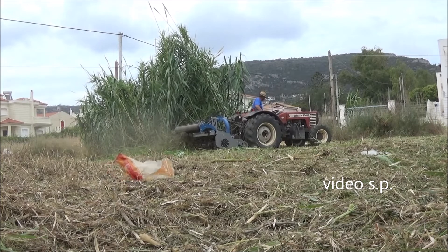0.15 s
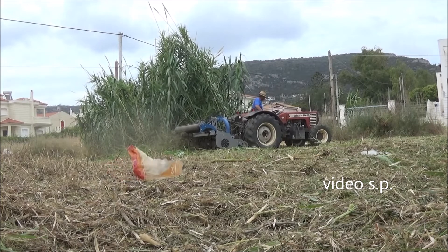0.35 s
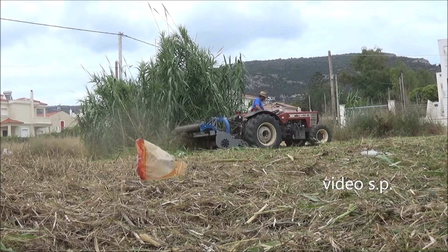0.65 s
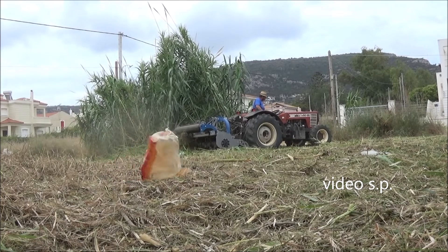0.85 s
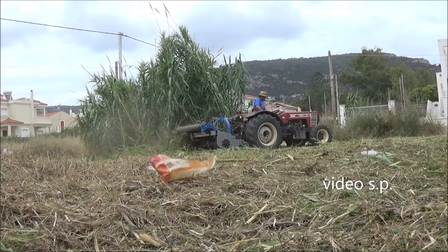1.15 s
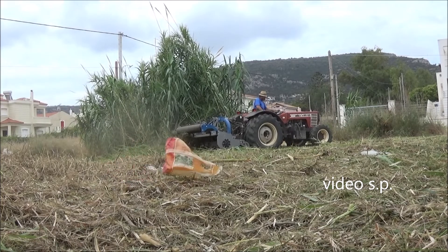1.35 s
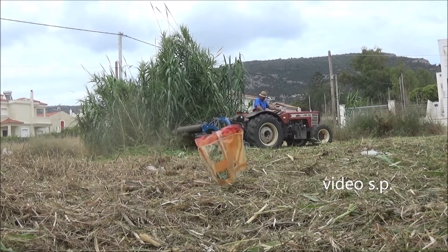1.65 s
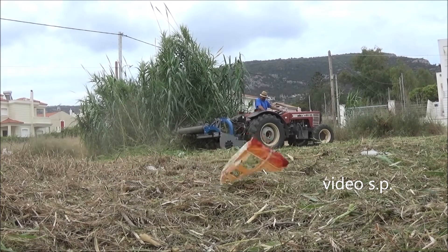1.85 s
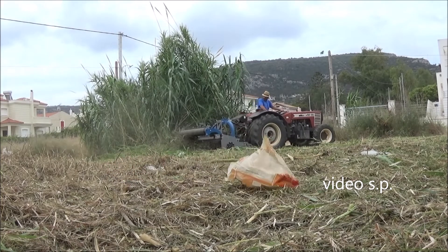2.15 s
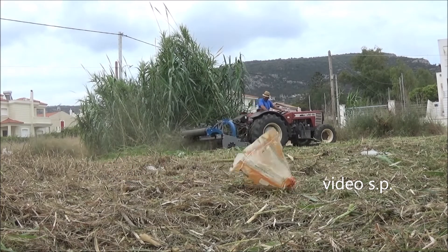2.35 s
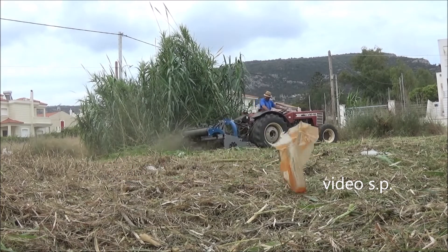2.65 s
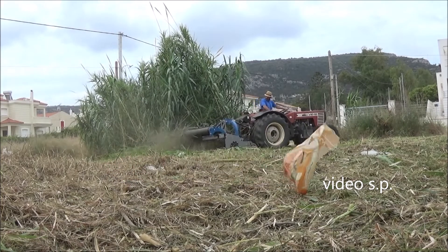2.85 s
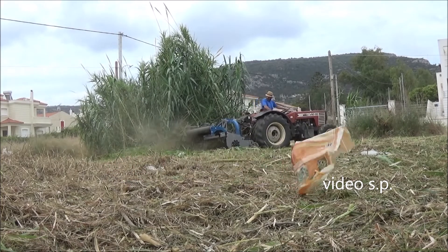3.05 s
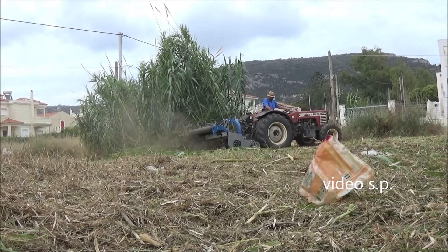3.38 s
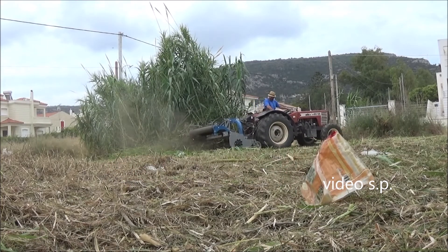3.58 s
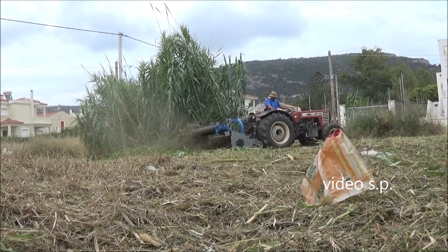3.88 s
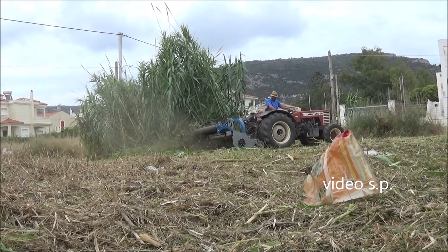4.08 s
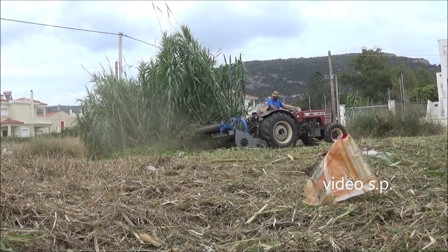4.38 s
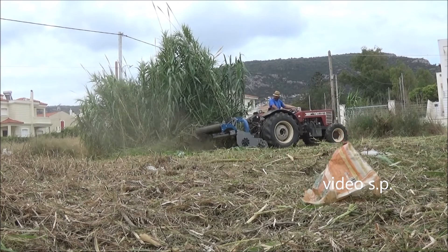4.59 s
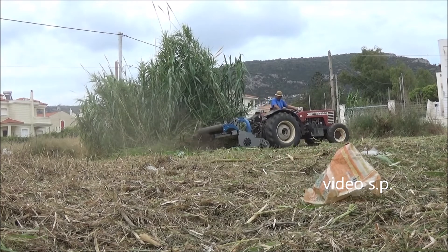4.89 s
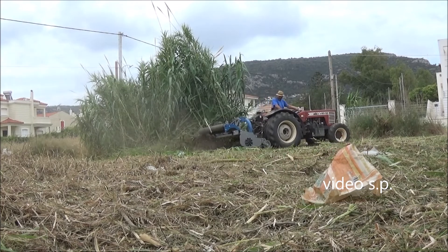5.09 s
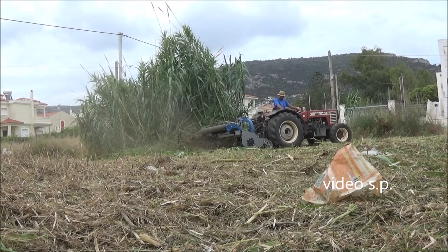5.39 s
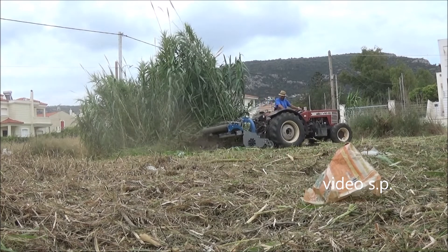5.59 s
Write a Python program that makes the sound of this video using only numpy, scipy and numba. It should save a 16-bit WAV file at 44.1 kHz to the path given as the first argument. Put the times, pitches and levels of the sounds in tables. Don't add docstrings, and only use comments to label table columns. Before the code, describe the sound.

Bright, crackling hiss of reeds being chopped, fast flail ticks at first, then thicker and louder, with a humming tractor engine beneath.

```python
import sys
import numpy as np
from scipy import signal
from scipy.fft import rfft, irfft, next_fast_len
from scipy.io import wavfile
from scipy.ndimage import uniform_filter1d, minimum_filter1d
from numba import njit

SR = 44100
rng = np.random.default_rng(int(sys.argv[2]) if len(sys.argv) > 2 else 0)


def undo_db(level):
    steps = np.asarray(level, float) / 20
    return 10 ** steps


def store_wav(level_fs):
    pcm = np.round(np.clip(np.atleast_2d(level_fs), -1, 1) * 32767)
    wavfile.write(sys.argv[1], SR, pcm.T.astype(np.int16))


N = 252693
T = np.arange(N) / SR
HZ = np.fft.rfftfreq(next_fast_len(N), 1 / SR) + 1
TURN_S = .036916

# time_s, note_hz, note_db, rumble_db
ENGINE = [(0.0, 102.5, -48, -41), (0.01, 104.6, -40.5, -37.5), (1.42, 103.1, -35.5, -30),
          (1.76, 102.9, -36.5, -33), (1.85, 103.4, -42, -35.5), (2.36, 97.5, -45, -37.5),
          (2.55, 97.54, -39, -35.5), (2.57, 97.6, -45, -38), (3.19, 97.75, -35.5, -38),
          (3.38, 99.8, -44, -39), (3.54, 100.3, -38, -35.5), (4.41, 100.3, -50, -39),
          (4.58, 100.1, -40, -35), (4.9, 101.4, -50, -43), (5.7, 102.3, -47, -36.5),
          (5.73, 101.5, -59, -45)]
# start_s, peak_db, pitch_hz, rattle_ms, phase_scatter_rad
SPLINTERS = [(0.5317, 0, 4100, 7.7, 1.8), (.851, -8.5, 2830, 15, 1.8), (1.146, -5, 3327, 9.2, 2.1),
             (1.294, -7, 2930, 13, 1.3), (1.3647, -5, 3380, 13.4, 1.7), (1.589, -8, 3090, 11, 1.1),
             (1.663, -19, 3300, 7, 2), (1.7343, -10, 3350, 11, 1.9), (1.826, -3, 9000, 32, .3),
             (1.87, -8, 2030, 16, 0.79), (2.246, -3, 4200, 10, 1.3), (2.257, -8, 5600, 16, 1.8),
             (2.290, 0, 5480, 17, 2), (2.305, -7, 5760, 34, 1.3), (2.5789, -5, 2800, 32, .9),
             (2.640, -7, 4810, 16, 0.88), (2.640, -8, 2860, 14, 0.9), (3.195, -5, 5560, 14, 1.6),
             (3.237, -8, 5110, 20, 1.8), (3.684, -7, 5550, 27, 1.7), (3.773, -2, 5660, 34, 1.9),
             (4.607, -6, 5000, 10, 1.3), (4.749, -5, 5300, 21, 1.93), (4.772, 0.5, 5580, 34, 1.2)]


def unit(x):
    return x / np.sqrt(np.mean(x ** 2))


def at(table, hz):
    points = np.array(table)
    return np.interp(np.log(hz), np.log(points[:, 0]), points[:, 1])


def curves(table):
    s, *columns = np.transpose(table)
    return [np.interp(T, s, c) for c in columns]


def walk(rate):
    hold = int(SR / rate)
    steps = np.repeat(rng.standard_normal(N // hold + 1), hold)
    slewed = uniform_filter1d(uniform_filter1d(steps, hold), hold)
    return unit(slewed[:N])


def bands(source, colour, lo_hz, count):
    # pitch_hz, side_minus_mid_db
    width = [(60, -25), (110, -25), (200, -20.5), (380, -18.5), (700, -18), (1290, -13), (2380, -18),
             (4400, -17), (8120, -16.5), (15000, -55)]
    spectra = rfft(source, next_fast_len(N)) * undo_db(at(colour, np.minimum(HZ, 15200)))
    spectra[1] *= undo_db(at(width, HZ))
    spectra /= np.sqrt(np.sum(np.abs(spectra[0]) ** 2) * 2) / len(HZ) / 2
    for k in range(count):
        place = 2 * np.log2(HZ / lo_hz) - k
        mid, side = irfft(spectra * np.cos(np.pi / 2 * np.clip(place, -1, 1)) ** 2)[:, :N]
        yield lo_hz * 2 ** (k / 2), np.array([mid + side, mid - side])


def bursts(s, size, decay_s):
    kicks = np.bincount(np.clip(s * SR, 0, N - 1).astype(int), size, N)
    return signal.lfilter([1], [1, -np.exp(-1 / (decay_s * SR))], kicks)


def stalk_snaps():
    moment, luck = rng.random((4000, 2)).T
    crackle = bursts(moment * N / SR, undo_db(-5.0 * np.log(1 - .98 * luck)), 0.00073)
    return 1.71 + crackle / crackle.mean()


def impacts():
    # time_s, level_db
    slap_levels = [
        (0, 8),
        (.3, 8),
        (.45, 9),
        (.6, 8),
        (.78, 12),
        (1.0, 9.5),
        (1.18, 7),
        (1.3, -6),
        (1.8, -10),
    ]
    # start_s, level_db
    single_cracks = [(.129, 2), (.240, 11), (.8187, 5), (.903, 7), (1.276, 15.5), (1.618, 11.5),
                     (1.7109, 15.5), (1.7297, 9), (1.975, 8), (2.078, 6), (2.952, -6), (2.997, 4),
                     (3.0537, 8), (3.142, 8), (3.288, 16), (3.571, 6), (3.593, 11), (3.860, 11), (3.869, 2),
                     (4.158, 10), (4.219, 7), (4.244, 8), (4.654, 10), (4.962, 11), (5.044, 10),
                     (5.1133, 11), (5.263, 4), (5.317, 11), (2.931, 4), (5.535, 10.5)]
    turns = np.arange(.0308, slap_levels[-1][0], TURN_S)
    slap_db = np.interp(turns, *np.transpose(slap_levels)) + 1.0 * rng.standard_normal(len(turns))
    crack_s, crack_db = np.transpose(single_cracks)
    strike_s, peak_db, _, rattle_ms, _ = np.transpose(SPLINTERS)
    strike_db = peak_db + 19.5 - 1.4 * rattle_ms
    slaps = bursts(turns, undo_db(2 * slap_db + 5), .0007)
    cracks = bursts(crack_s, undo_db(2 * crack_db + 7), .0004)
    return slaps + cracks + bursts(strike_s, undo_db(2 * strike_db), .0052)


def feed_swell():
    # peak_s, swell_db, length_ms
    bundles = [(0.58, 0.5, 30), (0.097, 7, 11), (0.165, 3, 7.9), (0.265, 6.5, 25), (0.385, 6, 7),
               (0.537, 4, 26), (0.66, 6, 14), (0.734, 2, 7.4), (1.035, 4.5, 15), (1.225, 7.5, 17),
               (1.0, -3.5, 18), (1.838, 2.5, 49), (2.04, -2, 25), (2.643, 4, 57), (2.93, 1.5, 45),
               (3.074, 10, 12), (3.124, 2, 18), (3.165, 7, 8.5), (3.2, 2, 11), (3.56, 4, 20),
               (3.285, 7, 15), (3.62, 12, 11), (4.575, 7, 15), (4.612, 1, 18), (4.76, -1, 40),
               (4.955, -2.5, 25), (5.075, 13, 17), (5.04, -3, 15), (5.52, 3, 15), (5.555, 1, 19)]
    grab_s = .0398 + 2 * TURN_S * np.arange(24)
    grab_db = (7 + 0.9 * rng.standard_normal(24)) * np.clip(2 * (1.9 - grab_s), 0, 1)
    grabs = [(s, db, 12) for s, db in zip(grab_s, grab_db)]
    swell = np.zeros(N)
    for s, db, ms in list(bundles) + grabs:
        near = slice(max(int(s * SR) - SR // 8, 0), int(s * SR) + SR // 5)
        span_ms = np.where(T[near] < s, .33, .85) * ms
        swell[near] += db * np.exp(-((T[near] - s) * 1000 / span_ms) ** 2)
    return swell


def shredding():
    # time_s, hiss_db, wood_db
    feed = [(0, -20, 1), (.45, -21, -1), (.56, -16.5, 2), (.7, -21.5, 0.5), (1.45, -20.5, 1),
            (1.8, -14.5, 3), (1.96, -8, 2), (2.2, -13, 3.5), (2.6, -12.5, 3.5), (3.0, -13, -1.5),
            (3.25, -14.5, 0), (3.5, -11.5, 1.5), (4.05, -9, 1.5), (4.25, -11, -1), (4.76, -10, 3.5),
            (4.93, -11.5, -2.5), (5.15, -13.5, 2.5), (5.73, -7.5, 1)]
    # pitch_hz, density_db_per_hz
    reed_colour = [(350, -56), (600, -22.5), (920, -25), (1370, -11.5), (1970, -7.5), (2490, -9),
                   (2850, -6), (4630, -5.5), (5690, -4.5), (6810, -6), (9360, 0.5), (11000, -4),
                   (13400, -11.5), (15200, -19.5), (16200, -80)]
    hiss_db, wood_db = curves(feed)
    engine_db = curves(ENGINE)[2]
    snap_db = -0.42 * hiss_db + wood_db
    roar_db = -0.74 * hiss_db + 0.42 * wood_db + 0.64 * engine_db
    snap_db, roar_db = snap_db - snap_db.mean(), roar_db - roar_db.mean()
    crackle, hits, swell = stalk_snaps(), impacts(), feed_swell()
    hood = -0.41 * swell
    noise = rng.standard_normal((2, 2, N))
    noise[1] = np.sign(noise[1])
    bed_bands = bands(noise[0], reed_colour, 613.0, count=11)
    hit_bands = bands(noise[1] * np.sqrt(hits), reed_colour, 710.0, count=11)
    shared, out = walk(30), 0
    for (hz, bed), (_, hit) in zip(bed_bands, hit_bands):
        low, high = np.clip(np.log2(np.array([4500 / hz, hz / 4500])), 0, 1)
        colour_db = low * roar_db + (1 - low - high) * snap_db
        flicker_db = swell + (1 - high) * hood + 0.27 * shared + 0.73 * walk(20)
        snapping = undo_db(flicker_db) * unit(crackle ** (.5 - 0.22 * low)) * bed
        hit_db = -12.0 * low + 8 * np.log2(max(hz / 9000, 1))
        out = out + undo_db(colour_db) * (snapping + undo_db(hit_db) * np.sqrt(hits.mean()) * hit)
    return undo_db(hiss_db + 1.5) * out


def clinks():
    out = np.zeros(N)
    shake = [walk(300) for _ in range(3)]
    flutter_db = [3.0 * walk(200) for _ in range(3)]
    for s, db, hz, ms, rough in SPLINTERS:
        near = slice(int(s * SR), int(s * SR) + SR // 8)
        age = (T[near] - s).clip(0) * 1000 / ms
        envelope = np.minimum(1, 12 * age) * np.exp(-age ** 2)
        second, third = (.91, 1.07) if hz > 5300 else (1.12, .8)
        modes = [(hz, -10), (hz * second, -13), (hz * third, -16)]
        for k, (mode_hz, mode_db) in enumerate(modes):
            ring = np.sin(2 * np.pi * mode_hz * T[near] + rough * shake[k][near])
            out[near] += undo_db(db + mode_db + flutter_db[k][near]) * ring * envelope
    return out


def diesel():
    # multiple_of_crank_speed, level_db against the rumble
    orders = [(2, -37), (5, -23), (6, -9.5), (7, -14.5), (8, -8.5), (9.5, -10.5), (11.5, -12.5),
              (12.5, -12), (14, -11.5), (17, -13), (19, -18), (22, -17.5), (28, -16), (38.5, -26.5),
              (42, -13)]
    # pitch_hz, density_db_per_hz
    rumble_colour = [(15, -56), (25, -33), (64, -18), (97, -12.5), (128, -7.5), (309, 0), (396, -5),
                     (448, -1.5), (531, -9), (884, -18), (1000, -13.5), (1300, -33), (2200, -120)]
    note_hz, note_db, rumble_db = curves(ENGINE)
    body_db = -0.22 * (rumble_db - rumble_db.mean())
    crank = np.cumsum(note_hz / 4) * 2 * np.pi / SR
    tones = 0
    for k, db in orders:
        waver = rng.uniform(0, 2 * np.pi) + (.3 + .048 * k) * walk(15)
        level_db = db + 2.0 * walk(14) + body_db * (k > 13)
        tones = tones + undo_db(level_db) * np.sin(k * crank + waver)
    noise = rng.standard_normal((2, N)) * (1 + 0.08 * np.cos(2 * crank))
    rumble = 0
    for hz, band in bands(noise, rumble_colour, 25., count=12):
        rumble = rumble + undo_db(1.1 * walk(10) + body_db * (hz > 330)) * band
    skew = 0.017 * walk(2.77) * np.array([[1], [-1]])
    note = np.sqrt(2) * undo_db(note_db + 1.0 * walk(9.8)) * np.sin(4 * crank + skew)
    return note + undo_db(rumble_db) * (undo_db(4.0) * tones + undo_db(2.0) * rumble)


def scene():
    return diesel() + undo_db(np.array([[.12], [-.12]])) * (shredding() + clinks())


@njit
def let_go(need, release):
    gain, g = np.empty(len(need)), 1.
    for i in range(len(need)):
        g = min(need[i], g + (1 - g) * release)
        gain[i] = g
    return gain


def band_limit(x):
    return signal.sosfilt(signal.butter(12, 16400, fs=SR, output="sos"), x)


def record(dry):
    limit_db, look_s, release_s, top_hz = -1.2, .0025, .013, 15680
    look = int(look_s * SR)
    need = np.minimum(1, undo_db(limit_db) / (np.abs(dry).max(axis=0) + 1e-9))
    need = minimum_filter1d(need, 2 * look + 1, origin=-look // 2)
    gain = uniform_filter1d(let_go(need, 1 / (release_s * SR)), look // 2)
    lowpass = signal.ellip(10, .2, 70, top_hz, fs=SR, output="sos")
    limited = signal.sosfilt(lowpass, dry * gain)
    return band_limit(np.clip(limited, -1, 1))


dry = scene()
out = record(dry)
store_wav(out)
```